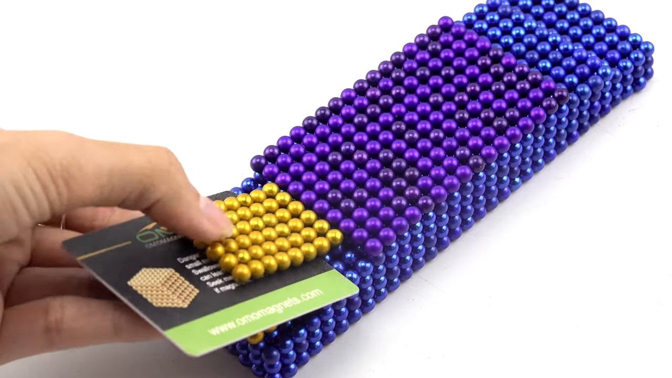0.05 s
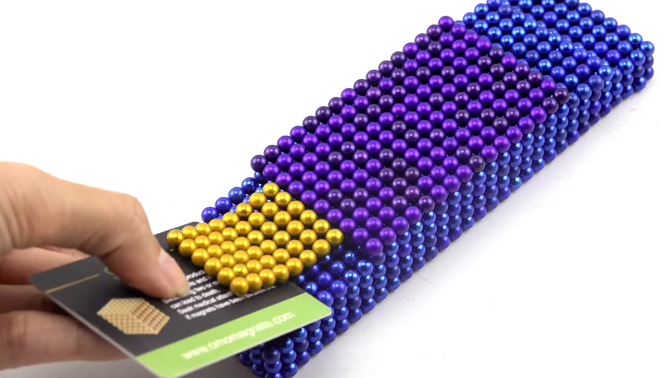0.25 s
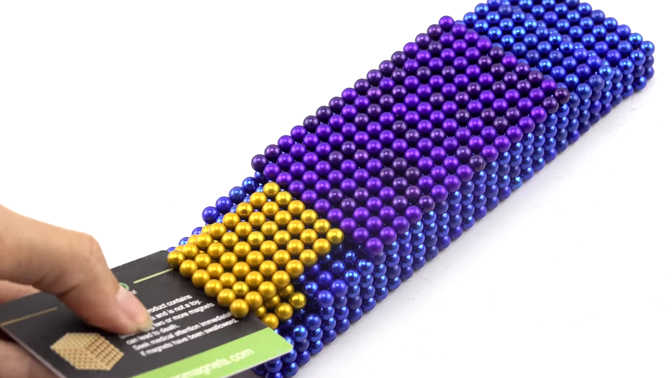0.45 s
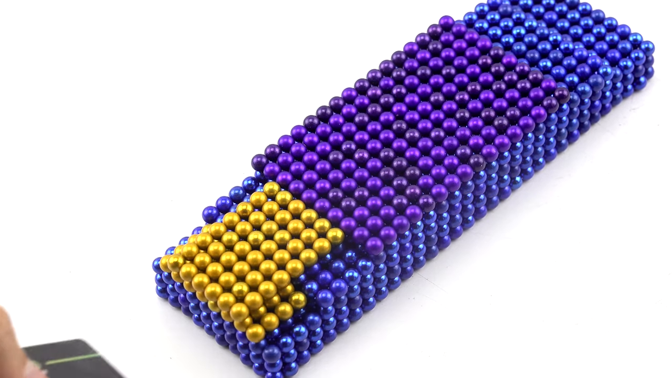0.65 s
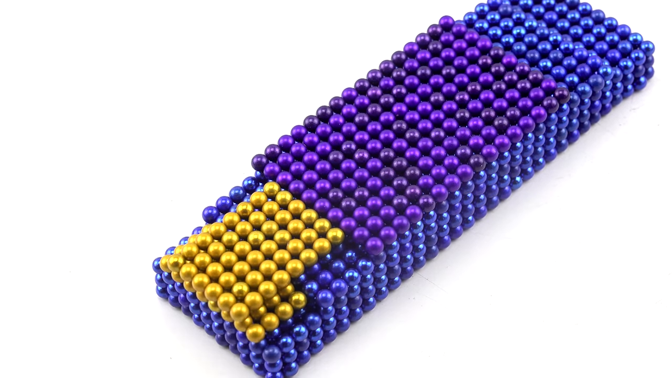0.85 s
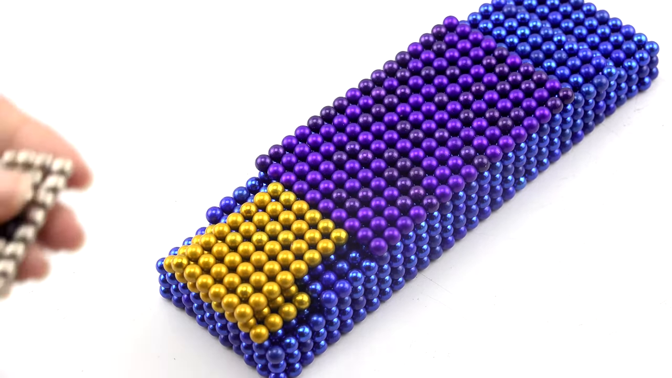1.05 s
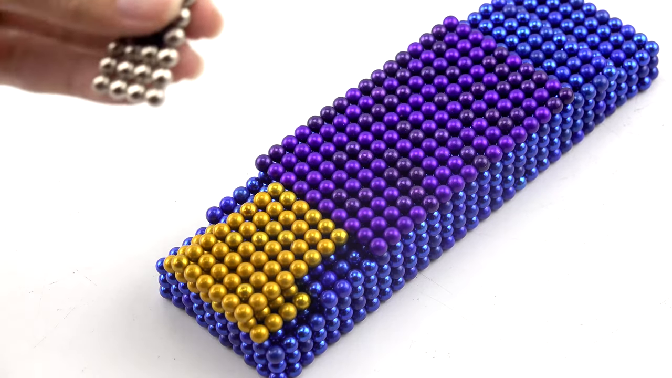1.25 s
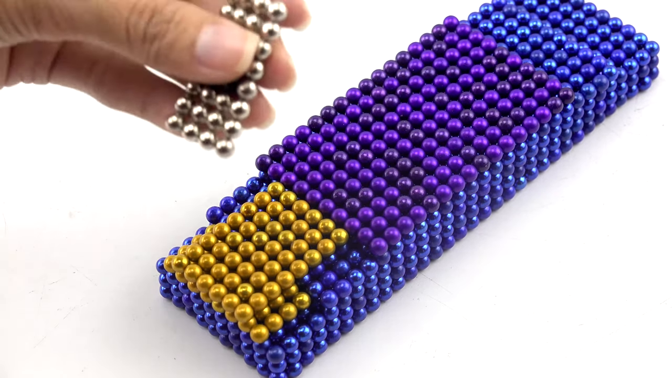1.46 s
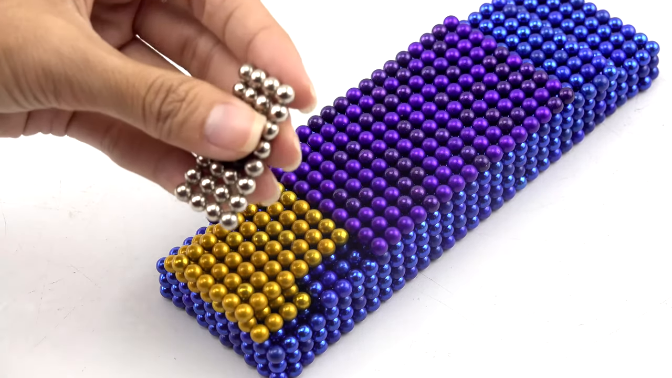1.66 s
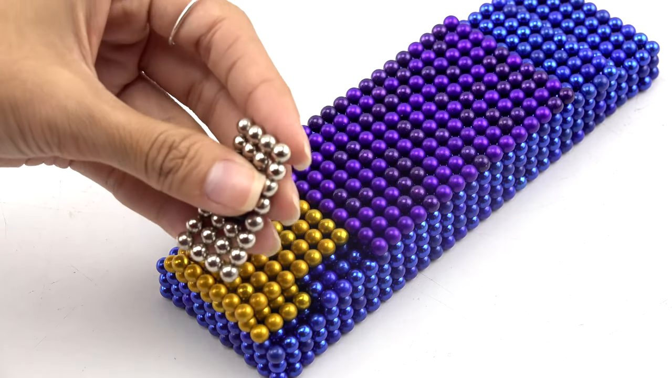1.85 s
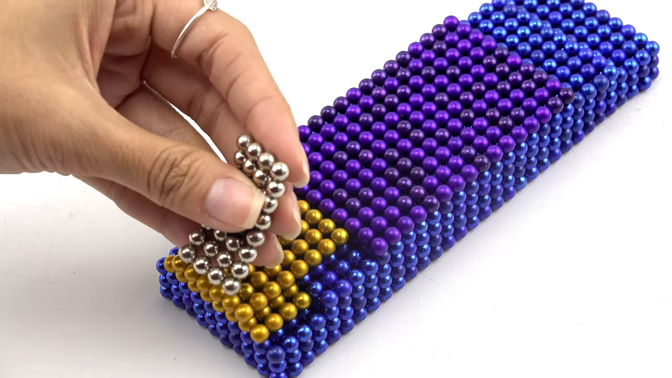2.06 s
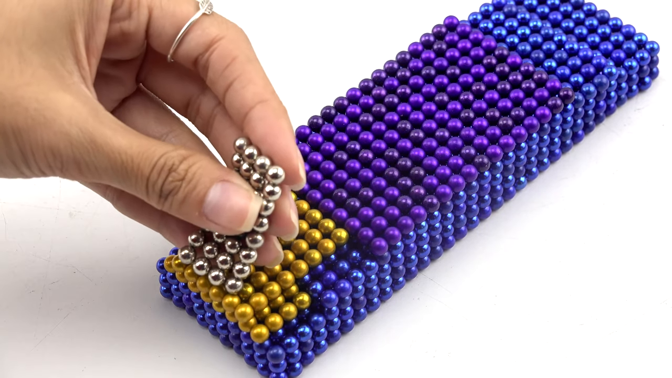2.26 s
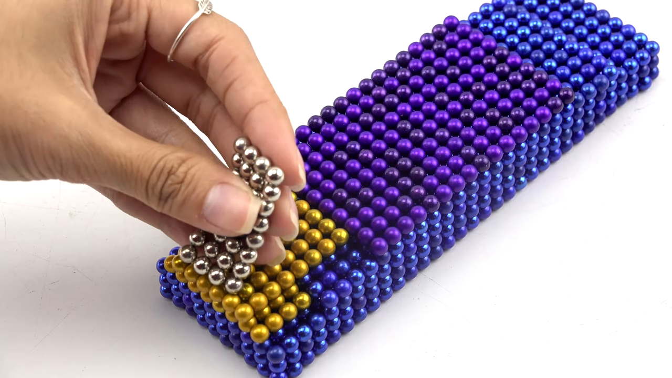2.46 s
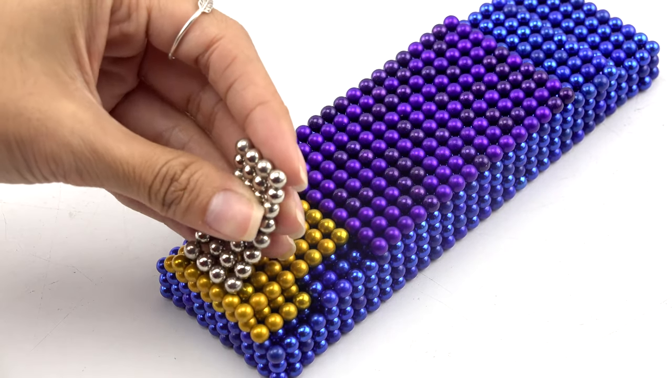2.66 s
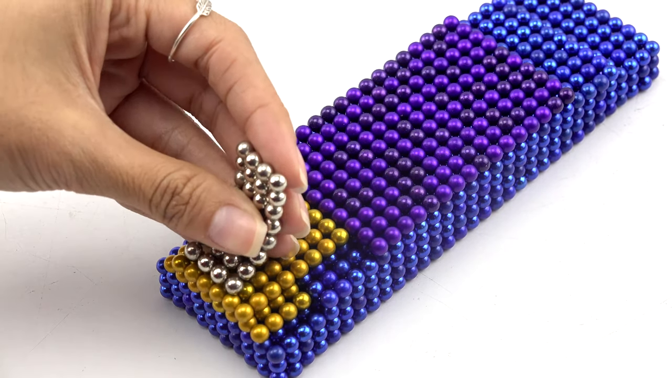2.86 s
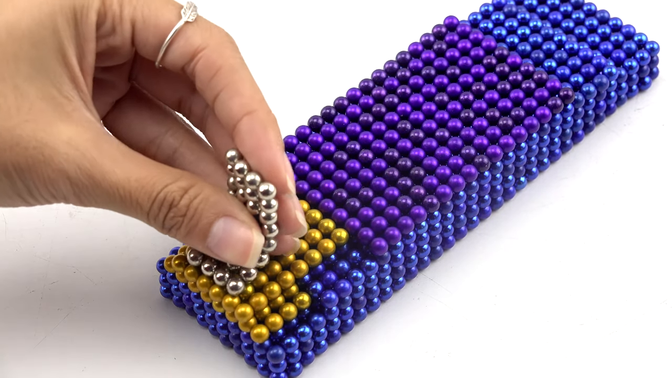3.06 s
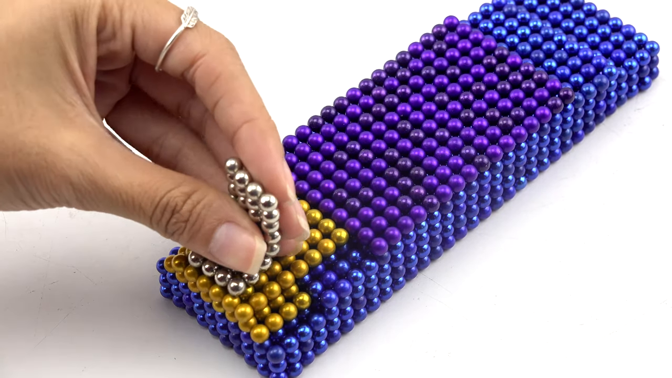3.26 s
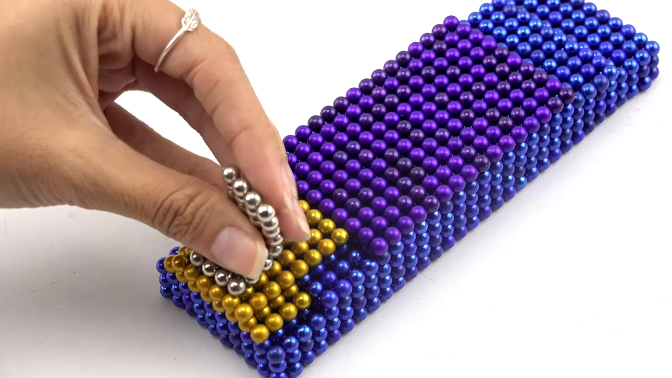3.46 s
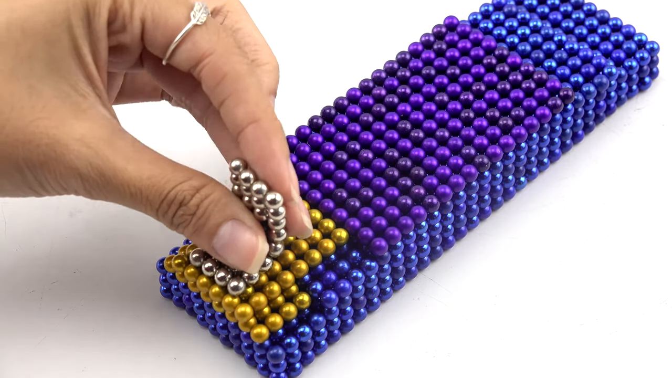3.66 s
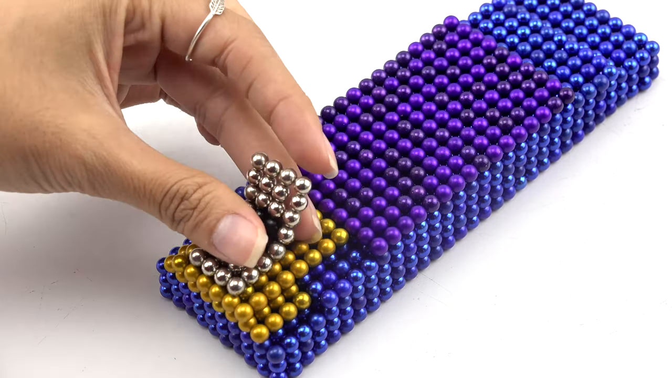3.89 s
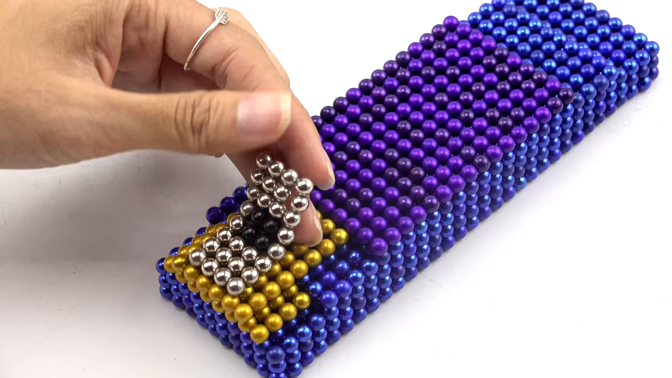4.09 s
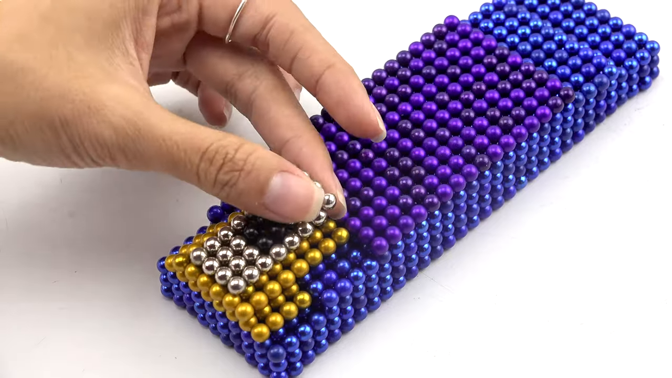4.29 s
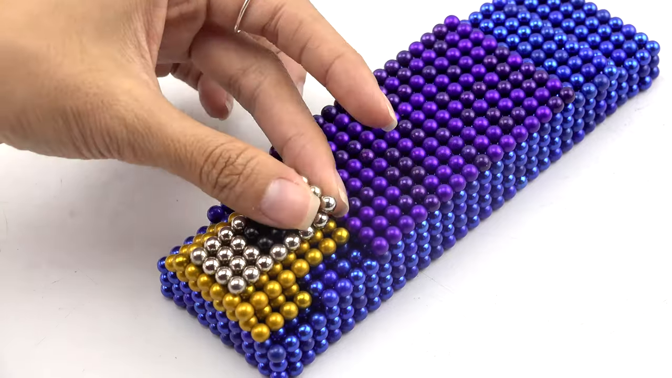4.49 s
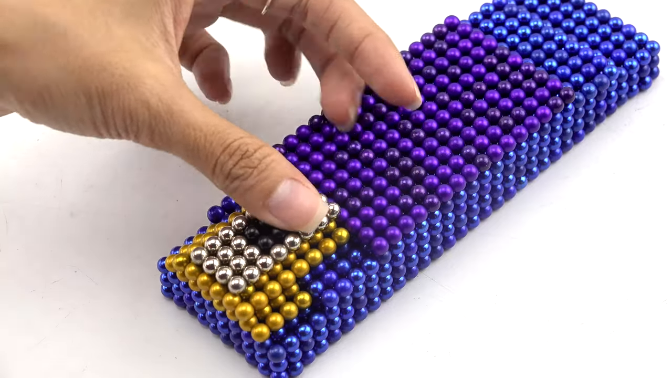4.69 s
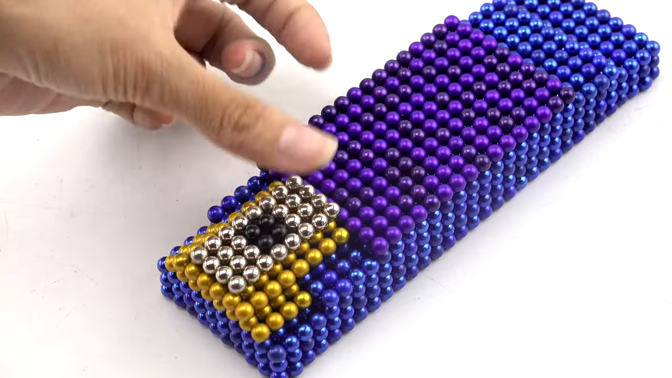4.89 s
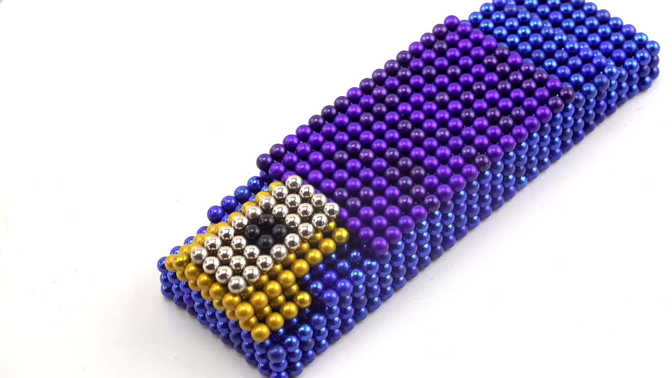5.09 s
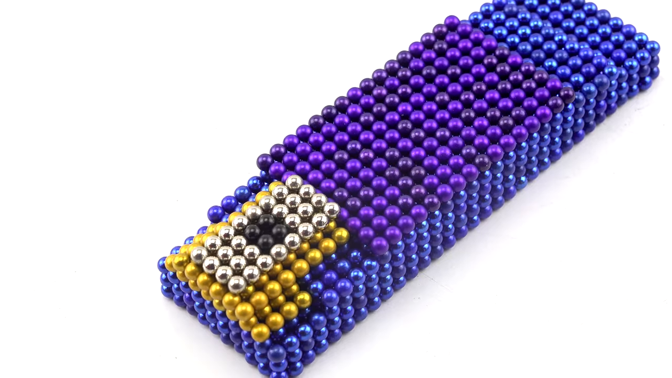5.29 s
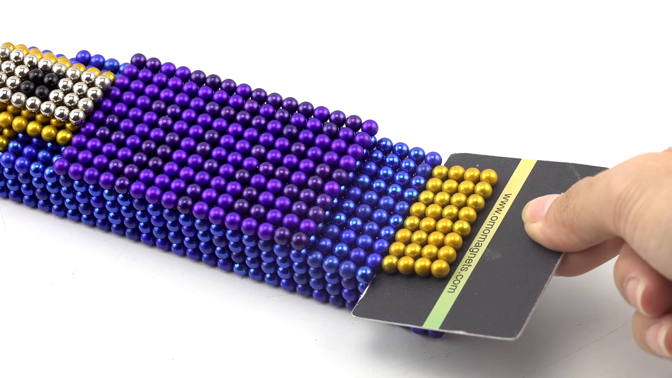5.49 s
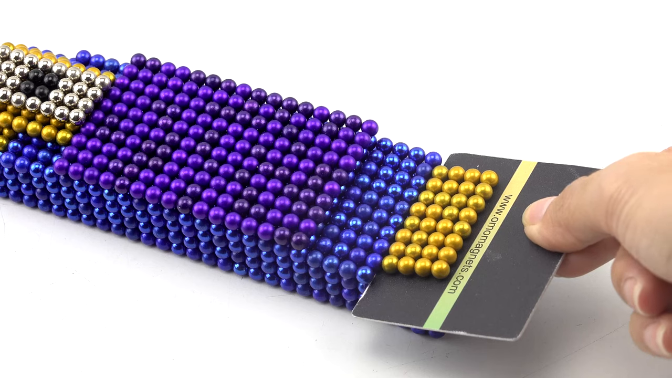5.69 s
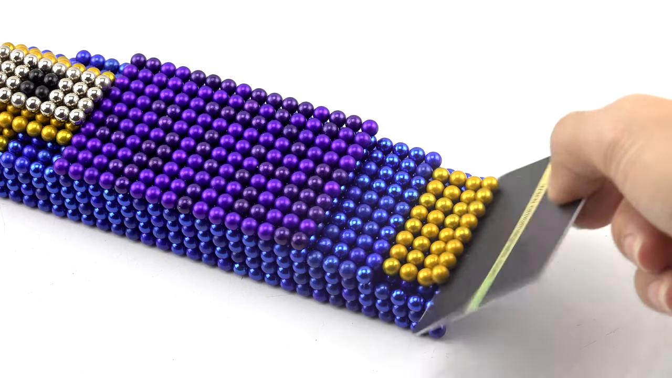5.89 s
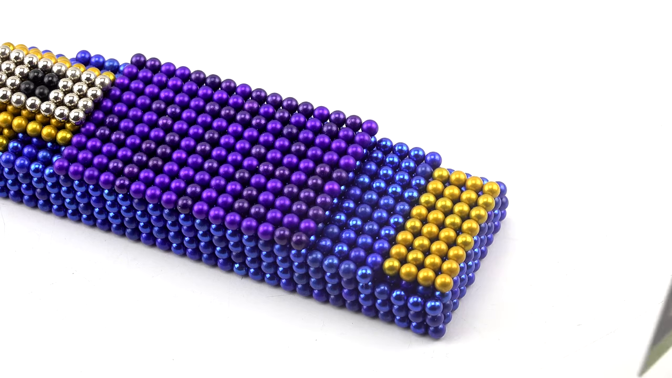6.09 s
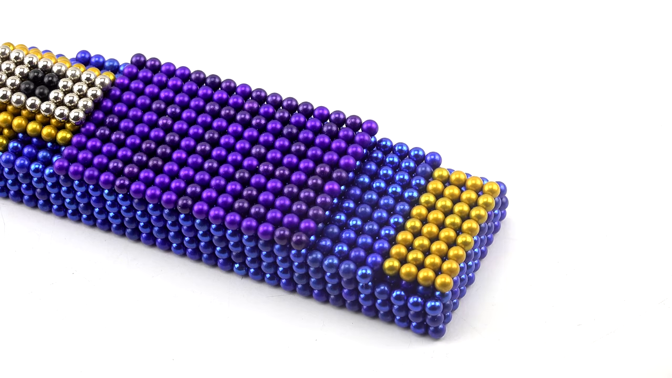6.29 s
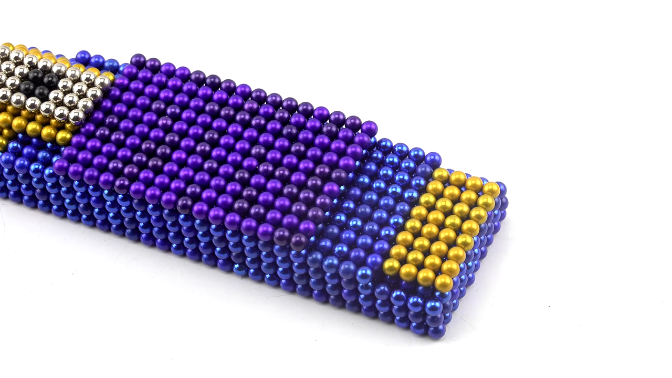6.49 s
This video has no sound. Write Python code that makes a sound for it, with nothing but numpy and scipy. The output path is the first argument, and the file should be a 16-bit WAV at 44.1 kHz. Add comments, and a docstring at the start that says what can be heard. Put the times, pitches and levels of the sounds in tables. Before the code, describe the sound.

Small magnetic balls click and snap together in sharp bursts and scattered single clacks, with brief rattles over a low indoor hum.

```python
"""Sheets of small magnetic balls are slid off a card and pressed onto a block of such balls, on a table.
Over a low, wavering hum in a small room, the card sings and sinks as the first rows snap home, each a
brief cascade of collisions that rings the block. A lone snap follows at 2.2 s, then a scattered run
from 3 to 4.7 s, with brief low booms and rattles of loose balls in between. Near 6 s comes a last tight
burst with the heaviest chatter. The loudest snaps overload the close microphone."""
import sys
import numpy as np
from scipy import signal
from scipy.fft import rfft, irfft
from scipy.io import wavfile
from scipy.ndimage import uniform_filter1d

SR = 44100
rng = np.random.default_rng(int(sys.argv[2]) if len(sys.argv) > 2 else 0)


def store_pcm(level_fs):
    """Save levels as 16-bit WAV."""
    pcm = np.round(np.clip(level_fs, -1, 1) * 32767).astype(np.int16)
    wavfile.write(sys.argv[1], SR, np.atleast_2d(pcm).T)


N = 288414
TIME = np.arange(N) / SR

# rows snapping home: t/s, level/dB, cascade decay/s, body below 2 kHz/dB, tick above 5 kHz/dB, ring f/Hz
SNAPS = [(0.044, -27, 0.0099, -2, -7, 2320), (0.069, -8.5, 0.0053, 2, -13, 3390),
         (0.078, -6, 0.0094, 2, -11, 4085), (0.129, -4.5, 0.014, 1.5, -1.5, 3236),
         (0.144, -6, .0075, -1, -9, 3314), (0.214, -3, .012, 0.5, -1.5, 3490),
         (0.293, -14.5, .006, 2.5, -5, 1834), (0.373, -6, 0.012, 0.5, 2, 1943),
         (0.463, -4.5, 0.014, 0.5, 2, 1967), (0.533, -1.5, 0.01, 4, 7.5, 3199),
         (0.590, -6.5, 0.016, 7.5, 13, 3734), (2.229, -6, 0.0059, 13, 6, 3160),
         (3.0493, -3, 0.0052, 6.5, 6, 3195), (3.193, -26.5, 0.0084, 9, -9, 1790),
         (3.212, -10, 0.0053, 14.5, 4.5, 2880), (3.4222, -23.5, 0.0095, 10.5, -1, 2800),
         (3.5195, -29.5, 0.018, 11, 6.5, 1683), (3.5737, -10, 0.0072, 14, 6.5, 2900),
         (3.606, -12, 0.0067, 17, 8, 1480), (3.906, 0, 0.0049, -4.5, 8.5, 2900),
         (3.954, -20, 0.013, 16.5, 4, 2845), (4.0737, -26.5, 0.0041, 13.5, 6, 3040),
         (4.399, -9.5, 0.0071, 4, -9.5, 1700), (4.461, -38.5, .003, 0, 6, 3500),
         (4.502, -31.5, 0.0081, 13.5, -21.5, 1636), (4.694, -20, .0075, 4, 15, 3050),
         (4.7021, 2, 0.0068, -7, 2, 3980), (5.914, -2, 0.0074, -0.5, 6, 3020),
         (5.927, -9, 0.012, 12, 5, 2085), (5.9492, 4, 0.0083, 8.5, 3.5, 2960),
         (5.973, 3.5, 0.0062, 6.5, 7.5, 2700), (5.991, 0.5, 0.009, -3.5, 8.5, 3320),
         (6.029, -11.5, .014, 9, 6.5, 4220), (6.0498, -11, .014, 16.5, 7, 3620)]


def undb(db):
    """Decibels to gain."""
    return 10 ** (np.asarray(db) / 20)


def unit(x):
    """Scale to unit energy."""
    return x / np.sqrt(np.sum(x ** 2))


def add(track, s, sound):
    """Mix a sound into a track at time s."""
    start = int(s * SR)
    part = sound[:len(track) - start]
    track[start:start + len(part)] += part


def spectrum_db(points, hz):
    """Read an EQ curve of (f/Hz, level/dB) points on a log-frequency axis."""
    f, db = np.transpose(points)
    return np.interp(np.log(hz + 1), np.log(f), db)


def walk(per_s):
    """Smooth random drift with a spread near 1."""
    hold = int(SR / per_s)
    steps = np.repeat(rng.standard_normal(N // hold + 1), hold)
    return 1.3 * uniform_filter1d(uniform_filter1d(steps, hold), hold)[:N]


def mode(x, hz, width_hz):
    """One decaying mode of steady pitch, with gain 1 at its centre."""
    return signal.lfilter(*signal.iirpeak(hz, hz / width_hz, fs=SR), x)


def resonator(x, hz, width_hz):
    """A resonance with steep skirts; hz may glide."""
    turn = np.exp(2j * np.pi * np.cumsum(hz * np.ones(len(x))) / SR)
    lowpass = signal.butter(2, width_hz / 2, fs=SR, output="sos")
    return 2 * np.real(turn * signal.sosfilt(lowpass, x / turn))


def impacts(per_s, spread_db, count):
    """Random impulses of uneven strength, at rms 1."""
    hit = rng.random(count) < per_s / SR
    strength = undb(spread_db * np.minimum(rng.exponential(size=count), 3))
    return unit(hit * strength * rng.choice([-1, 1], count)) * np.sqrt(count)


def collision(body_db, tick_db, body_hz=2000, tick_hz=5200, size=1024):
    """The click of ball on ball; body and tick shelve its low and high ends."""
    # spectrum of one click: f/Hz, level/dB
    click_eq = [(100, -31), (280, -33.5), (500, -23), (900, -13), (1600, -1.5), (2400, 2.5), (3200, 5),
                (4100, 0.5), (5200, -4), (8000, -8), (11000, -15), (16000, -26.5)]
    hz = np.arange(size // 2 + 1) * SR / size
    body = 1 / (1 + (hz / body_hz) ** 8)
    tick = 1 - 1 / (1 + (hz / tick_hz) ** 8)
    magnitude = undb(spectrum_db(click_eq, hz) + body_db * body + tick_db * tick)
    # minimum phase keeps the attack hard
    cepstrum = irfft(np.log(magnitude))
    cepstrum[1:size // 2] *= 2
    cepstrum[size // 2 + 1:] = 0
    return unit(irfft(np.exp(rfft(cepstrum))))


def bout(s, hold_s, settle_s, rise_db_per_s=702, settle_power=1.17):
    """Envelope of a movement: it builds up to time s, holds, then dies ever faster, 60 dB in settle_s."""
    rise_db = rise_db_per_s * np.minimum(TIME - s, 0)
    settled = np.maximum(TIME - s - hold_s, 0) / settle_s
    return undb(rise_db) * np.exp(-np.log(1000) * settled ** settle_power)


def effort():
    """How hard the loose balls chatter from moment to moment."""
    # a sheet slides or settles: t/s, hold/s, level/dB, settling/s
    rattles = [(0.119, 0.058, -20.5, .34), (0.351, 0.13, -29, 0.28), (0.558, 0.079, -20, 0.22),
               (4.079, 0, -29.5, 0.14), (4.405, 0, -33.5, 0.068), (4.725, 0.021, -20, .13),
               (5.926, 0.0033, -9.5, .15), (6.03, 0.021, -6, 0.28)]
    return sum(undb(db) * bout(s, hold_s, settle_s) for s, hold_s, db, settle_s in rattles)


def hum(drone_db=3, air_db=-5.5, air_follow=.85, flicker_db=2, patchy_db=3, bands=14):
    """The bed: a low, wavering drone in a few narrow resonances, with faint, uneven air around it."""
    # resonances of the drone: f/Hz, width/Hz, level/dB
    drone_modes = [(51.7, 3.2, -18.5), (116, 13, 1), (154.7, 13, 1), (165, 18, -8)]
    # spectrum of the air: f/Hz, level/dB
    air_eq = [(20, -24.5), (40, -20.5), (75, -19.5), (100, -5), (135, 6.5), (175, -4.5), (205, -8.5),
              (270, -19), (450, -32), (1100, -35.5), (2000, -46), (3500, -50), (6000, -55.5),
              (15000, -61.5)]
    # fader ride of the bed: t/s, level/dB
    ride = [(0.0, -36.5), (0.16, -37.5), (0.29, -35), (0.84, -39), (1.4, -33.5), (1.49, -31), (2.46, -43),
            (2.95, -38), (3.22, -47), (3.86, -45.5), (3.97, -43.5), (4.24, -43), (4.46, -33.5), (4.63, -33),
            (5.08, -38), (6.54, -36.5)]
    hz = np.arange(N // 2 + 1) * SR / N
    peaks = sum(undb(db) / np.sqrt(width * (1 + (2 * (hz - centre) / width) ** 4))
                for centre, width, db in drone_modes)
    drone = irfft(rfft(rng.standard_normal(N)) * peaks, N)
    noise = rfft(rng.standard_normal(N)) * undb(spectrum_db(air_eq, hz))
    centres = np.geomspace(40, 4000, bands)
    # each band of the air flickers on its own
    air = sum(irfft(noise * np.interp(hz, centres, band), N) * undb(patchy_db * walk(per_s=14))
              for band in np.eye(bands))
    ride_db = np.interp(TIME, *np.transpose(ride))
    # the air swells less than the drone
    air_ride_db = air_follow * ride_db + (1 - air_follow) * np.mean(ride_db)
    air_gain = undb(air_db + air_ride_db + flicker_db * walk(per_s=12))
    return undb(drone_db + ride_db) * drone / np.std(drone) + air_gain * air / np.std(air)


def room(x, wet_db=-14, build_s=.006):
    """Diffuse reflections of a small room: a short tail, weaker in the treble."""
    # bands of the tail: f/Hz, t60/s, level/dB
    reflections = [(303.8, 0.24, 5), (970, 0.19, 6), (1684.5, 0.19, -2), (3600, 0.27, -2),
                   (5615, 0.23, -5.5), (9200, 0.32, -8), (12000, 0.24, -6.5), (16000, 0.24, -6.5)]
    t = TIME[:SR // 2]
    noise = rfft(rng.standard_normal(len(t)))
    hz = np.arange(len(noise)) * SR / len(t)
    centres, t60s, dbs = np.transpose(reflections)
    bands = [irfft(noise * np.interp(hz, centres, weight), len(t)) for weight in np.diag(undb(dbs))]
    tail = sum(band * np.exp(-np.log(1000) * t / t60) for band, t60 in zip(bands, t60s))
    response = unit(tail * (1 - np.exp(-t / build_s)))
    return undb(wet_db) * signal.oaconvolve(x, response)[:N]


def ticks(gain_db=4, hiss_db=-59, hiss_s=0.47):
    """Single faint ticks, each trailed by a trace of hiss."""
    # tick cues: t/s, relative level/dB
    cues = [(1.0226, -31), (4.26, -41), (5.494, -29.5), (6.4276, -35)]
    out, t = np.zeros(N), TIME[:SR]
    for s, db in cues:
        add(out, s, undb(db + gain_db) * collision(body_db=10, tick_db=8))
        add(out, s, undb(hiss_db) * rng.standard_normal(len(t)) * np.exp(-t / hiss_s))
    return out


def low_booms(swell_s=.018, sag=0.4, gain_db=1, scuff_db=-20):
    """Brief low booms: soft thumps and short swells of the hum, each with a dull scuff on top."""
    # boom cues: t/s, relative level/dB, mid-glide f/Hz
    cues = [(0.111, -24.5, 126), (0.227, -23, 109.7), (1.211, -29, 55.9), (2.218, -20.5, 127.3),
            (3.91, -22.5, 92), (4.269, -27, 130), (4.279, -33.5, 34), (4.394, -16.5, 104.8),
            (4.708, -18.5, 132.2), (4.759, -27.5, 71), (5.5, -31.5, 51.9), (6.131, -25.5, 138.4),
            (6.489, -25, 147.2)]
    out, t = np.zeros(N), TIME[:SR // 4]
    for s, db, hz in cues:
        swell = t / swell_s * np.exp(1 - t / swell_s)
        # the pitch sags through each boom
        pitch = hz * (1 + sag * (np.exp(-t / swell_s / 2) - .5))
        boom = np.sin(2 * np.pi * np.cumsum(pitch) / SR)
        scuff = resonator(rng.standard_normal(len(t)), hz=240, width_hz=240)
        scuff = undb(scuff_db) * swell * scuff / np.std(scuff)
        add(out, s, undb(db + gain_db) * swell * (boom + scuff))
    return out


def bumps(knock_db=-31.5, body_follow=0.8183, knock_hz=664, knock_peak_s=0.0023, width_share=0.51):
    """Dull, damped contacts: fingers rub, and each snap knocks the block on the table."""
    # soft finger rubs: t/s, level/dB, f/Hz, attack/s
    rubs = [(1.5, -48, 721, 0.015), (5.33, -59.5, 490, .04), (5.79, -57.5, 480, .03)]
    # the more body a snap has, the harder it knocks
    knocks = [(s, db + knock_db + body_follow * body_db, knock_hz, knock_peak_s)
              for s, db, _, body_db, _, _ in SNAPS]
    out, t = np.zeros(N), TIME[:SR // 3]
    for s, db, hz, peak_s in knocks + rubs:
        contact = rng.standard_normal(len(t)) * t / peak_s * np.exp(1 - t / peak_s)
        bump = unit(resonator(contact, hz, width_share * hz))
        add(out, s, undb(db) * np.sqrt(2 * peak_s * SR) * bump)
    return out


def card(pull_s=0.0606, hold_s=0.54, start_hz=2170, end_hz=1590, slide_db=-34, chatter_db=-6):
    """Balls bump over the plastic card and ring its damped bending mode, which sinks as it comes free."""
    drawn = np.clip((TIME - pull_s) / hold_s, 0, 1)
    hz = start_hz + (end_hz - start_hz) * drawn ** 3
    ring = resonator(impacts(per_s=1100, spread_db=1.5, count=N), hz, width_hz=400)
    drive = undb(slide_db) + undb(chatter_db) * effort()
    return drive * bout(pull_s, hold_s, settle_s=0.34) * ring / np.std(ring)


def chatter(gain_db=-2, low_hz=1200, top_hz=9800, catch_db=0.5):
    """Loose balls catch and slip on the card's edge, too light for bass and too gentle for the very top."""
    drive = effort() * undb(catch_db * walk(per_s=160))
    knocks = drive * impacts(per_s=1800, spread_db=3, count=N)
    knocks = signal.sosfilt(signal.butter(4, low_hz, "high", fs=SR, output="sos"), knocks)
    knocks = signal.sosfilt(signal.butter(6, top_hz, fs=SR, output="sos"), knocks)
    return undb(gain_db) * signal.oaconvolve(knocks, collision(body_db=1, tick_db=-1))[:N]


def block(x, ring=0.4):
    """The packed block rings briefly after every collision."""
    # modes of the block: f/Hz, width/Hz, relative level/dB
    block_modes = [(1534, 28, 1.5), (1800, 13, -19), (2240, 9.2, 1.5), (2690, 130, -4.5), (3484, 12, -1.5),
                   (3775, 330, 1), (4090, 62, -7.5), (5150, 220, -6.5)]
    ringing = sum(undb(db) * mode(x, hz, width) for hz, width, db in block_modes)
    return (x + ring * ringing) / np.sqrt(1 + ring)


def snaps(creep=0.48, creep_share=0.26, first_blow=0.41, crack=.6, crack_s=0.0014, ring=.8):
    """A row creeps for an instant, its first balls crack home, and the rest follow in a dying cascade."""
    lead, count = 512, 2900  # samples: ahead of the first blow, and in all
    out, t = np.zeros(N), (np.arange(count) - lead) / SR
    for s, db, cascade_s, body_db, tick_db, hz in SNAPS:
        before = creep * np.exp(-abs(t) / (creep_share * cascade_s))
        after = np.exp(-abs(t) / cascade_s) + crack * np.exp(-abs(t) / crack_s)
        envelope = np.where(t < 0, before, after)
        cascade = unit(impacts(per_s=4000, spread_db=1, count=count) * envelope)
        cascade[lead] += first_blow
        snap = signal.fftconvolve(cascade, collision(body_db, tick_db))
        snap = unit(snap + ring * mode(snap, hz, width_hz=750))
        add(out, s + t[0], undb(db) * np.sqrt(cascade_s * SR) * snap)
    return out


def suppress(x, threshold_db=-58, depth_db=-14, size=1024):
    """Noise suppressor: faint parts of the spectrum duck, so tails end early and the air turns patchy."""
    spectrum = signal.stft(x, nperseg=size)[2]
    power = uniform_filter1d(abs(spectrum) ** 2 * size, size=3, axis=-1)
    gain = np.maximum(power / (power + undb(threshold_db) ** 2), undb(depth_db))
    return signal.istft(spectrum * gain, nperseg=size)[1][..., :N]


def scene():
    """Mono mix: balls, card and bumps feed the room; ticks, booms and hum stay dry."""
    handling = block(snaps() + chatter()) + card() + bumps()
    return (handling + room(handling) + ticks() + low_booms() + hum())[None]


def record(dry):
    """Faint noise is suppressed, the loudest snaps clip, and the top is cut at 16.1 kHz."""
    clipped = np.clip(suppress(dry), -.95, .95)
    high_cut = signal.ellip(10, .2, 70, 16100, fs=SR, output="sos")
    return signal.sosfilt(high_cut, clipped)


dry = scene()
out = record(dry)
store_pcm(out)
```